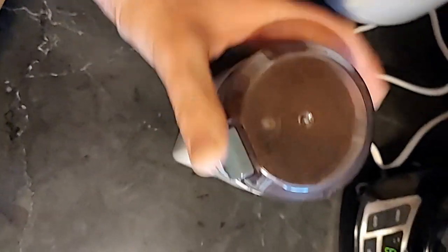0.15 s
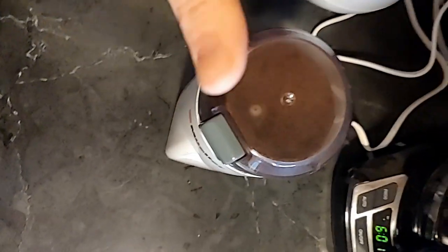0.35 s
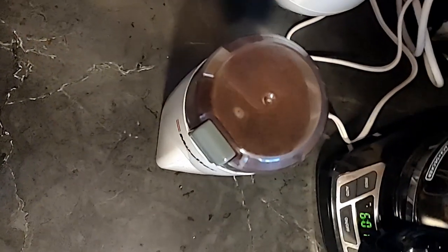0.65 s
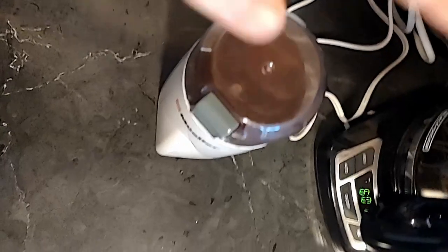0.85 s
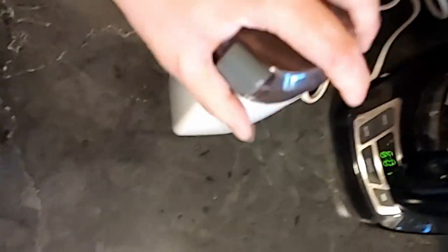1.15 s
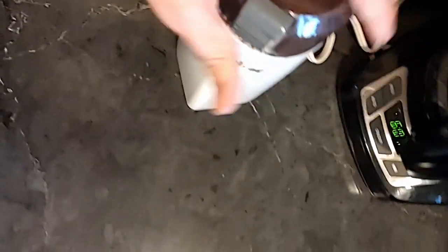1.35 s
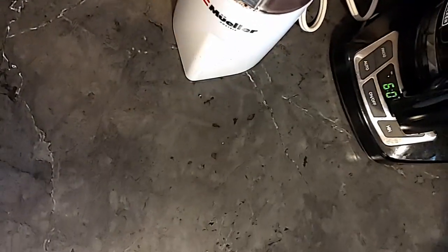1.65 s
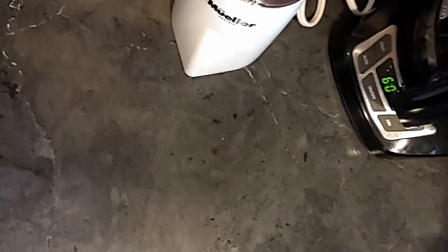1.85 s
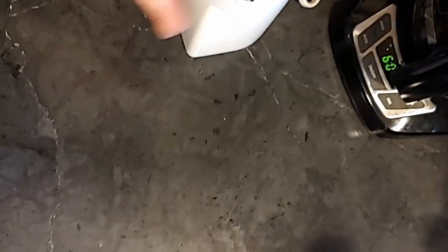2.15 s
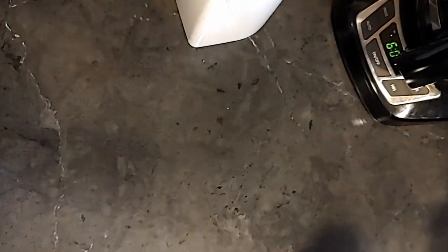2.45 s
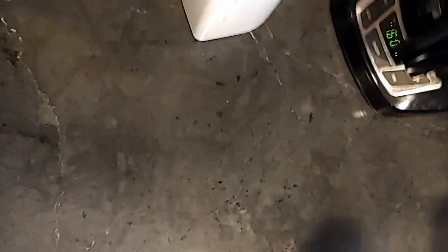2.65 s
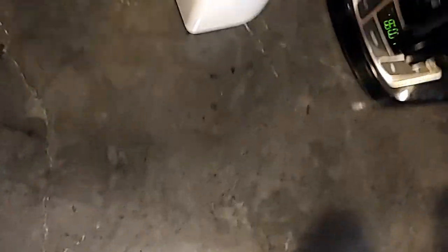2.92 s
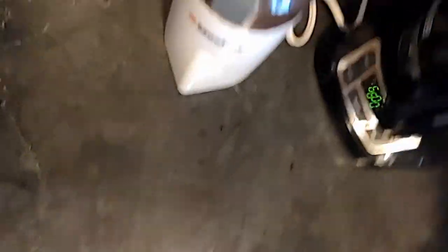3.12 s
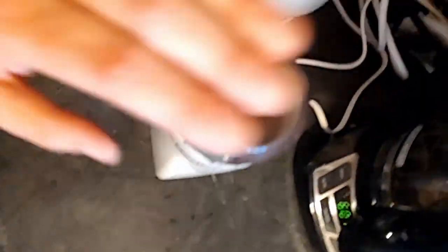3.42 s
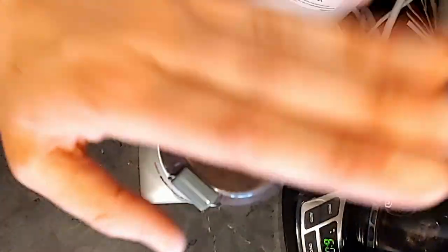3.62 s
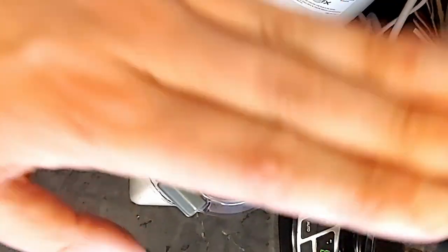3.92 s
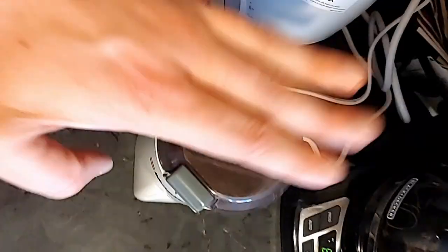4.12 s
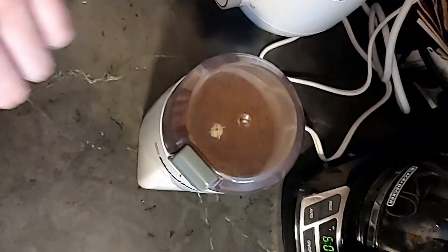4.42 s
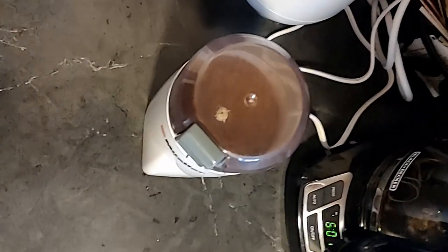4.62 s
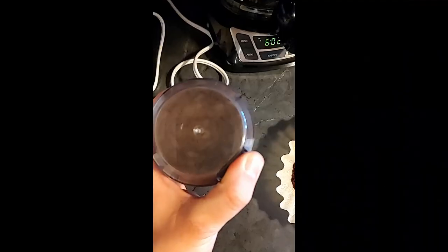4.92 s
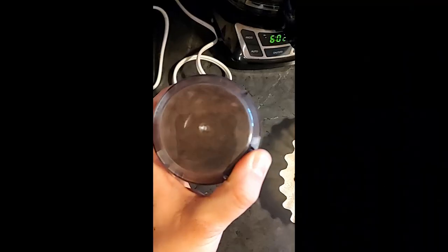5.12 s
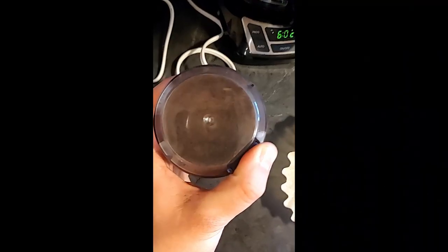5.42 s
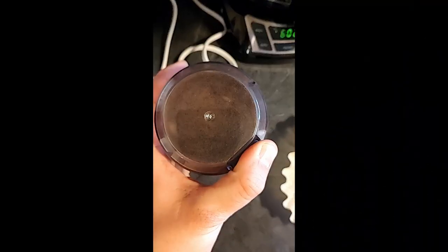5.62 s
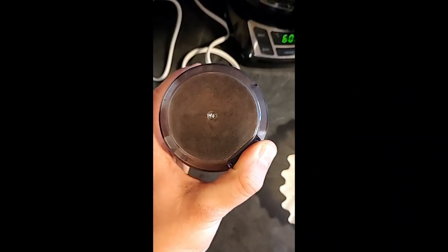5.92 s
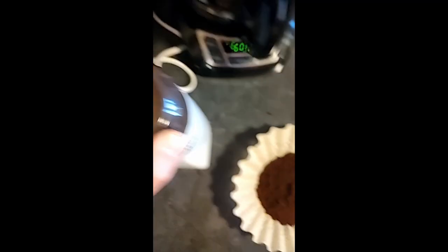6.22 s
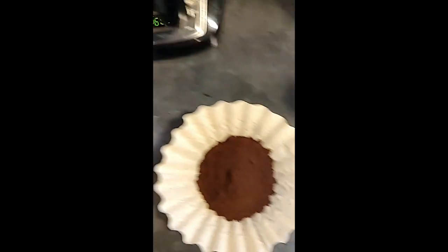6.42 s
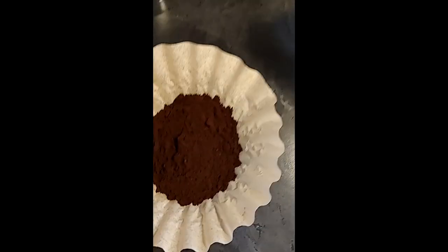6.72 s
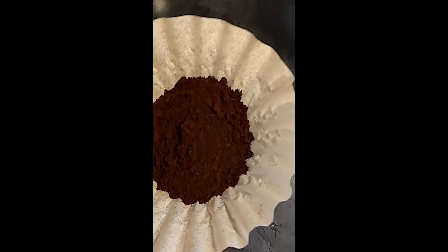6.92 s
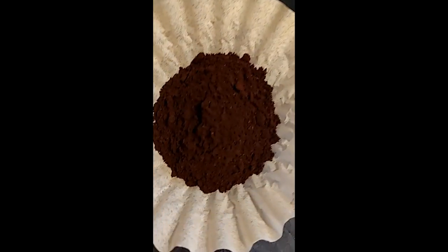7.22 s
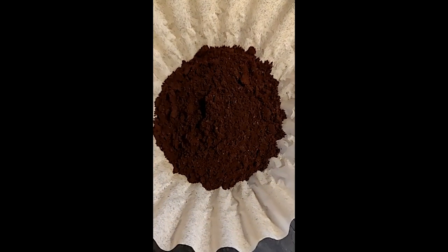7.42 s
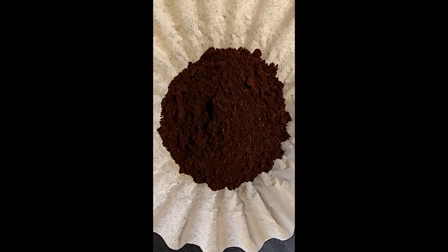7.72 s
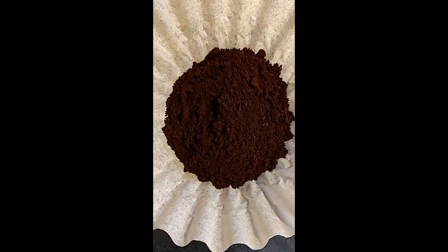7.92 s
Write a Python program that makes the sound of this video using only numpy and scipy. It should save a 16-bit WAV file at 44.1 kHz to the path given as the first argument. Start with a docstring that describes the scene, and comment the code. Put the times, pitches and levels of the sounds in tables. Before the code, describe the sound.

Close stereo on a kitchen counter: a small blade grinder whines loudly with a hissing rattle of nearly finished coffee powder. It switches off with a sharp lid clack and its pitch slides down to a stop. Four hollow plastic knocks, spaced in two pairs, sound over quiet room air. A faint tick and dull pop, a short total silence, then grinding cuts in abruptly with coarse, crackling beans.

```python
"""A kitchen counter, miked in stereo from close by: an electric blade grinder chops coffee beans, then coasts down.
Four knocks clack its lid and thud its housing; faint ticks and a dull pop follow, then the sound drops out.
It starts again on coarser beans, which crack on the blade as the rattle fills in and the churn grows.
The motor is a stack of wavering shaft orders, the coffee is noise shaped by random hits, the knocks are
ringing modes with bursts of noise; surfaces close by return early echoes, over quiet room air."""
import sys
import numpy as np
from scipy import signal
from scipy.fft import rfft, irfft, next_fast_len
from scipy.io import wavfile
from scipy.ndimage import uniform_filter1d, map_coordinates

SR = 44100
rng = np.random.default_rng(int(sys.argv[2]) if len(sys.argv) > 2 else 0)


def persist_wave(psi):
    """Save psi, clipped to +-1, as 16-bit WAV."""
    counts = np.round(np.clip(psi, -1, 1) * 32767).astype(np.int16)
    wavfile.write(sys.argv[1], SR, np.atleast_2d(counts).T)


N = 355446
TIME = np.arange(N) / SR
PULSE_HZ = 120  # torque pulses, two per mains cycle

# where the grinder stands, positive to the left: time_s, left_right_db
STEREO_PLACE = [(0.0, 0.5), (0.2, 1.5), (1.8, 0.5), (5.1, 3), (5.18, 4), (5.9, 7.0), (5.95, 4), (8.05, 0.5)]
# large pieces that crack on the blade, relative levels: start_s, crack_db, splinter_shower_db, shower_length_s
BLADE_CRACKS = [(0.195, -16, -24.5, 0.03), (0.567, -9, -32, 0.005), (0.951, -22, -34.5, 0.1),
                (1.397, -20, -30, 0.13), (1.529, -13.5, -35.5, 0.094), (1.663, -26, -34.5, 0.027),
                (1.686, -24, -39, 0.034), (1.745, -23, -37, 0.015), (5.08, -13, -23.5, 0.054),
                (5.202, -15, -27.5, 0.05), (5.259, -15, -35, 0.099), (5.35, -18, -30.5, 0.15),
                (5.449, -14, -30.5, 0.13), (5.553, -14, -30, 0.092), (5.625, -22, -30.5, 0.03),
                (5.767, -16, -23.5, 0.028), (5.946, -21, -28.0, 0.077), (6.084, -14, -27.5, 0.062),
                (6.219, -17, -26.5, 0.06), (6.289, -13, -28.5, 0.14), (6.369, -16, -29.5, 0.082),
                (6.546, -19, -24, 0.025), (6.605, -18, -28.0, 0.1193), (6.677, -16, -28, 0.21),
                (6.898, -12, -29, 0.11), (7.094, -16.5, -27, 0.0059), (7.19, -15, -30.5, 0.11),
                (7.387, -15, -26, 0.016), (7.443, -17, -29, 0.16), (7.633, -13, -28.5, 0.1064),
                (7.705, -11.5, -30, 0.11), (7.797, -14, -26.5, 0.13), (7.852, -14, -27.5, 0.12),
                (7.958, -18, -28, 0.025), (8.04, -13, -23.0, 0.011), (1.803, -37, -46, 0.0052)]
# spectrum of the rattle of coarse bits, relative: frequency_hz, level_db (per Hz)
COARSE_SPECTRUM = [(500, -39), (1100, -14), (1700, -7.5), (2700, -2), (4200, 0.5), (5200, -7), (7000, -7),
                   (9000, -11), (11000, -16.5), (13500, -11), (15800, -11)]
# spectrum of the churning powder, relative: frequency_hz, level_db (per Hz)
CHURN_SPECTRUM = [(30, -34), (70, -26.5), (110, -15), (190, -16.5), (280, -1.5), (420, -1), (600, 0),
                  (900, 2.5), (1200, 0), (2000, -21), (4000, -46.5)]
# spectrum of the lid's clack, relative: frequency_hz, level_db (per Hz)
CLACK_SPECTRUM = [(900, -24), (1600, -8.5), (2200, 0), (2800, -0.5), (3700, -0.5), (4800, -4), (5600, -15),
                  (7200, -13.5), (9500, -24.5), (13000, -27.5), (15400, -21)]
# resonances of the cup and lid: center_hz, width_hz, boost_db
CUP_RESONANCES = [(1230, 99, 8), (1784, 360, 5), (2450, 130, 1), (3240, 120, 2.5), (3820, 200, 6),
                  (7040, 330, 2.5), (11900, 400, 2), (15100, 210, 10.5)]
# resonances of the clack: center_hz, width_hz, boost_db
LID_RESONANCES = [(2040, 90, 4), (3200, 95, 3.5), (3700, 170, 1.5)]
# resonances of worktop and housing: center_hz, width_hz, boost_db
COUNTER_RESONANCES = [(129.9, 3.5, 10), (281, 20, 6), (384, 13, 4), (500, 28, 6), (586, 31, 4.5),
                      (760, 66, 2.5), (920, 40, 0.5)]


def amp(db):
    """Decibels to gain."""
    return np.exp(np.asarray(db) * np.log(10) / 20)


def unit(x):
    """Scale to rms 1."""
    return x / np.sqrt(np.mean(x ** 2) + 1e-20)


def along(points, hz):
    """Read (Hz, value) points on a log frequency axis."""
    f, v = np.transpose(points)
    return np.interp(np.log(hz + 1), np.log(f + 1), v)


def curves(rows):
    """One value per sample for each column after the time."""
    s, *cols = np.transpose(rows)
    return [np.interp(TIME, s, c) for c in cols]


def wobble(rate):
    """A smooth random curve, rate knots a second."""
    coarse = TIME[::SR // 2000]
    knots = rng.standard_normal(int(N * rate / SR) + 4)
    return np.interp(TIME, coarse, map_coordinates(knots, [coarse * rate]))


def panned(db):
    """Left and right gains for a level difference, positive to the left."""
    return amp(np.array([[.5], [-.5]]) * db)


def filtered(x, response):
    """Shape x by a response of frequency."""
    m = next_fast_len(N + 8192)
    return irfft(rfft(x, m) * response(np.fft.rfftfreq(m, 1 / SR)), m)[..., :N]


def lift(peaks, hz):
    """Decibels that resonances add at a frequency."""
    return sum(db / (1 + ((hz - c) / w) ** 2) for c, w, db in peaks)


def noise(spectrum, peaks=(), lead_s=.00018):
    """Stereo noise of rms 1 with resonances; it reaches the left microphone first."""
    # likeness of the two microphones: frequency_hz, correlation (0 to 1)
    likeness = [(60, .85), (120, 0.91), (380, 0.68), (700, 0.39), (1300, 0.28), (4000, 0.12), (15000, 0.11)]
    colour = lambda hz: amp(along(spectrum, hz) + lift(peaks, hz))
    turn = lambda hz: np.arccos(np.clip(along(likeness, hz), -1, 1)) / 2
    mid, side = filtered(rng.standard_normal((2, N)),
                         lambda hz: colour(hz) * [np.cos(turn(hz)), np.sin(turn(hz))])
    left_right = np.array([mid + side, mid - side])
    return unit(filtered(left_right, lambda hz: np.exp(1j * np.pi * lead_s * np.outer([1, -1], hz))))


def fade(t, t60, rise):
    """Envelope of a blow at t = 0: a smooth onset, then exponential decay."""
    t = np.maximum(t, 0)
    return amp(-60 * t / t60) * (1 - np.exp(-(t / rise) ** 2))


def held(start, end, t60):
    """1 from start to end, then an exponential release."""
    return (TIME >= start) * amp(-60 * np.maximum(TIME - end, 0) / t60)


def ringing(blows, cup_t60, room_db, room_t60):
    """Envelope of many impacts: the energy of each dies fast in the cup and slowly in the kitchen."""
    t = TIME[:SR // 2]
    cup = fade(t, cup_t60, rise=0.00068)
    room = amp(room_db) * fade(t, room_t60, rise=0.0013)
    return np.sqrt(np.abs(signal.fftconvolve(blows ** 2, cup ** 2 + room ** 2)[:N]))


def kitchen():
    """Quiet room air, as shaped noise, with a faint mains hum and a hiss that comes and goes."""
    # spectrum of the room air, relative: frequency_hz, level_db (per Hz)
    air_spectrum = [(30, -31.5), (70, -19), (115, 2.5), (170, -17.5), (260, -3), (600, -3), (850, -4.5),
                    (1300, -16), (2300, -24.5), (3300, -21), (4700, -27), (6000, -31.5), (9500, -39),
                    (15800, -44)]
    # faint hiss: time_s, level_db
    hiss_levels = [(2.55, -105), (2.65, -68), (2.9, -67), (2.98, -96.5), (3.1, -75), (3.55, -73.5),
                   (3.75, -105)]
    air = amp(-65.5 + 0.7 * wobble(5)) * noise(air_spectrum, [(3300, 90, 6)])
    hum = amp(-78) * np.sin(2 * np.pi * PULSE_HZ * TIME)
    hiss_spectrum = [(1000, -14), (3500, 0), (7300, -1), (9800, -10), (12000, 0.5), (15500, 2.0)]
    return air + hum + amp(curves(hiss_levels)[0]) * noise(hiss_spectrum)


def motor(table, orders, whine_db, powered, speed, tone_db, hum_db, throb, jitter, waver_db, pan_db):
    """Shaft orders with torque sidebands; as speed falls from 1 they fade and sweep the housing's resonances."""
    coast_db_per_octave, coast_db_per_order = 12, 2  # fade as the speed halves; each higher order by so much more
    coast_ring = 2.7  # how strongly the gliding orders excite the housing
    coast_quiet = .45  # below this share of the running speed the motor falls silent
    coast_ragged_db = 2.2  # the loose shaft chatters
    unpowered_db = -6  # overtones with the power off
    whine_follows = 0.27  # share of the shaft tone's swells that the high orders take part in
    running_hz, shaft_db, second_db = curves(table)
    hz, octaves = running_hz * speed, np.log2(speed)
    whine_db = whine_db + whine_follows * (shaft_db - np.mean([row[2] for row in table]))

    grid = np.arange(SR // 8)  # Hz
    housing_db = coast_ring * lift(COUNTER_RESONANCES, grid)
    chatter_db = coast_ragged_db * (1 - powered) * wobble(45)
    dying_db = chatter_db - 20 * np.log10(1 + (coast_quiet / speed) ** 20)

    def coasting_db(k):
        """Level change of order k away from full speed."""
        slope = coast_db_per_octave + coast_db_per_order * (k - 1)
        swept_db = np.interp(k * hz, grid, housing_db) - np.interp(k * running_hz, grid, housing_db)
        return dying_db + slope * octaves + swept_db

    turns = 2 * np.pi * np.cumsum(hz * (1 + jitter * wobble(45))) / SR  # beans brake the blade unevenly
    mains = 2 * np.pi * PULSE_HZ * TIME
    spread = np.array([[.5], [-.5]])  # phase between the microphones
    shudder = .04 * wobble(170)  # single impacts jolt the blade and roughen the high orders
    shaft = turns + 0.56 * spread
    sidebands = .55 * np.sin(shaft + mains) + .12 * np.sin(shaft - mains)
    shaft_gain = amp(shaft_db + tone_db + coasting_db(1) + 1.2 * wobble(26))
    out = shaft_gain * (np.sin(shaft) + powered * throb * sidebands)

    overtones = [(2, second_db + tone_db + 0.94)]
    overtones += [(k, whine_db + db + waver_db * wobble(6)) for k, db in orders]
    for k, db in overtones:
        phase = k * turns + rng.uniform(0, 2 * np.pi) + spread * min(k / 2, np.pi / 2)
        torque = 1 + powered * throb * np.cos(mains + rng.uniform(0, 2 * np.pi))
        gain = amp(db + coasting_db(k) + unpowered_db * (1 - powered) + 1.8 * wobble(40))
        out = out + gain * np.sin(phase + k * shudder) * torque
    hum = amp(hum_db + wobble(23)) * powered * np.sin(mains)
    return out * panned(pan_db) + hum


def pelting(hits_per_s, size_db, clump_db, throb):
    """Envelope, rms 1, of bits that hit the cup at random, in clumps, hardest at each torque pulse."""
    struck = rng.random(N) < hits_per_s / SR
    blows = struck * amp(size_db * np.clip(rng.standard_normal(N), -2, 2) + clump_db * wobble(70))
    blows = blows * (1 + throb * np.sin(2 * np.pi * PULSE_HZ * TIME))
    return unit(ringing(blows, cup_t60=.012, room_db=-14.0, room_t60=0.26))


def coffee(spectrum, hits, rattle_db, churn_db, splinter_db, splinter_churn_db):
    """The hits rattle the cup, over the churn of the powder; after every crack the splinters swell both."""
    showers = splinters()
    rattle = np.hypot(amp(rattle_db), amp(splinter_db) * showers) * hits
    bits = rattle * noise(spectrum, CUP_RESONANCES) * panned(curves(STEREO_PLACE)[0])
    powder = np.hypot(amp(churn_db), amp(splinter_churn_db) * showers) * noise(CHURN_SPECTRUM)
    return bits + powder


def reflected(x):
    """Hard surfaces nearby send back early copies, weaker in the bass, that comb the sound."""
    # splashback and appliances: left_delay_s, right_delay_s, level_db (above the bass)
    surfaces = [(.0031, 0.0042, -14), (.0069, 0.0061, -14.5), (0.0105, .0121, -16), (0.017, 0.014, -19)]
    copies = lambda hz: sum(amp(db) * np.exp(-2j * np.pi * np.outer([left, right], hz))
                            for left, right, db in surfaces)
    return filtered(x, lambda hz: 1 + copies(hz) * hz / (hz + 600))


def fine_run():
    """Nearly finished powder at a nearly steady speed; switched off, the blade coasts against drag and friction."""
    # motor under power, relative levels: time_s, shaft_hz, shaft_db, second_order_db
    fine_motor = [(0.0, 362.7, -34, -33.5), (0.14, 359.6, -41.5, -42), (0.37, 362.0, -33.5, -36.5),
                  (0.788, 366, -33.5, -40.5), (0.87, 363.2, -32, -33.5), (1.008, 368.7, -30.5, -47),
                  (1.12, 364.5, -32.5, -33.5), (1.202, 368, -30.5, -48), (1.27, 361, -40, -36.5)]
    # shaft orders, relative levels: multiple, level_db
    fine_orders = [(3, 0.5), (4, -5), (5, 4), (6, -2), (7, 0.8), (8, -16), (9, -6.5), (10, -5.5), (11, 4.5)]
    # spectrum of the rattle of fine bits, relative: frequency_hz, level_db (per Hz)
    fine_spectrum = [(500, -29.5), (1100, -15.5), (1700, -9), (2700, -5), (4200, -3.5), (5200, -11.5),
                     (7000, -13), (9000, -16), (11000, -19.5), (13500, -15), (15800, -12)]
    switch_off_s, run_end_s = 1.288, 1.8
    coast_s, friction = .7, .43  # drag time constant; dry friction as a share of the drag at full speed
    coast_rattle_db = -13  # rattle with the power off

    powered = held(0, switch_off_s, t60=.12)
    slowing = np.exp(-np.maximum(TIME - switch_off_s, 0) / coast_s)
    speed = np.maximum((1 + friction) * slowing - friction, .01)
    hits = pelting(hits_per_s=2300, size_db=6.0, clump_db=2.0, throb=.3)
    grounds = coffee(fine_spectrum, hits,
                     rattle_db=-27.5 + coast_rattle_db * (1 - powered) + .6 * wobble(15),
                     churn_db=-47.5 + 1.5 * wobble(12), splinter_db=-.5, splinter_churn_db=-14)
    whine = motor(fine_motor, fine_orders, -37.3 + 0.64 * wobble(6.7), powered, speed, tone_db=3.5,
                  hum_db=-53.5, throb=0.39, jitter=0.0035, waver_db=1.5, pan_db=-3.5)
    return (whine + reflected(grounds)) * held(0, run_end_s, t60=0.15)


def cracks():
    """Large pieces snap on the blade; a few ring the lid, which also clacks and thumps as it is let go."""
    # bits settle in the resting cup, relative levels: start_s, level_db
    settling_ticks = [(2.843, -45.5), (4.614, -52.5)]
    # the lid is struck, relative levels: start_s, ring_db, clack_db, upper_modes_db
    lid_strikes = [(1.288, -19, -8.5, 4), (1.398, -37, -30, -12), (6.907, -21, -40, -29),
                   (7.096, -24.5, -29, -15)]
    # ringing modes of the lid, relative levels: frequency_hz, level_db, t60_s
    lid_tones = [(1208, 1.5, .07), (3040, -7.5, 0.066), (3510, 1, 0.036)]
    snap, slap, ring = np.zeros((3, N))
    t = TIME[:SR // 4]
    for s, db, *_ in BLADE_CRACKS + settling_ticks:
        snap[round(s * SR)] = amp(db)
    for s, db, clack_db, bright_db in lid_strikes:
        slap[round(s * SR)] = amp(clack_db)
        for k, (hz, level, t60) in enumerate(lid_tones):
            tone = np.sin(2 * np.pi * hz * t + rng.uniform(0, 2 * np.pi))
            gain = amp(db + level + bright_db * (k > 0))
            ring[round(s * SR):][:len(t)] += gain * fade(t, t60, rise=0.002) * tone
    sharp = amp(-7) * ringing(snap, cup_t60=0.046, room_db=-23, room_t60=0.25)
    sharp = sharp * noise(COARSE_SPECTRUM, CUP_RESONANCES)
    clack_and_thump = amp(3) * noise(CLACK_SPECTRUM, LID_RESONANCES) + amp(-3.5) * noise(CHURN_SPECTRUM)
    clack = ringing(slap, cup_t60=0.019, room_db=-23.5, room_t60=0.22) * clack_and_thump
    return (sharp + clack + ring) * panned(curves(STEREO_PLACE)[0])


def splinters():
    """Level of the showers: each starts with its crack, sags while it lasts and dies away."""
    shower_sag_db, shower_t60 = 2.5, 0.13  # weakening over its length; decay afterwards in s
    energy, t = np.zeros(N + SR), TIME[:SR // 2]
    for s, _, db, length in BLADE_CRACKS:
        sag_db = shower_sag_db * (.5 - np.minimum(t / length, 1))
        dying_db = -60 * np.maximum(t - length, 0) / shower_t60
        energy[round(s * SR):][:len(t)] += amp(db + sag_db + dying_db) ** 2
    return np.sqrt(energy[:N])


def knocks():
    """Each blow clacks the lid and thuds the hollow housing on the counter; the ring swells again a moment later."""
    # knocks on the grinder, relative levels: start_s, level_db, clack_db, left_right_db, hollow_hz,
    # tail_t60_s, late_swell_db, swell_delay_s, worktop_boom_db
    blows = [(2.262, -4, -7.5, -0.5, 617, 0.26, -22, 0.1, -26.5),
             (2.604, -5, -7.5, -2, 643, 0.35, -20.5, 0.11, -27),
             (3.801, -0.5, -15.5, 2.5, 794, 0.2, -32.5, .105, -31.5),
             (4.182, -3, -11, 2, 618, 0.28, -22.5, 0.1, -34)]
    # modes of the housing on the counter, relative levels: frequency_hz, level_db, t60_s
    housing_modes = [(140, -27, 0.13), (428, -17.5, 0.159), (586, -5, 0.11), (737, 4, 0.048),
                     (867, -22, 0.27), (1012, -27, 0.26), (1102, -27.5, 0.13), (1180, -11, 0.11),
                     (1394, -20, 0.087)]
    # spectrum of the thud, relative: frequency_hz, level_db (per Hz)
    thud_spectrum = [(41, -63), (70, -37), (119, -7.5), (209, -19.5), (269, -8), (321, -13.5), (392, -3.5),
                     (491, -2.5), (539, -5), (650, -1.5), (1070, -2.5), (1410, -11), (1700, -9.5),
                     (2210, -40.5), (3740, -120)]
    out = np.zeros((2, N))
    thud = noise(thud_spectrum, COUNTER_RESONANCES)
    clack = noise(CLACK_SPECTRUM, LID_RESONANCES)
    dull = filtered(clack, lambda hz: 1 / (1 + (hz / 6500) ** 2))  # the kitchen soaks up the treble
    t = TIME[:SR // 2]
    spread = np.array([[.4], [-.4]])  # phase between the microphones

    def mode(hz, t60):
        """One decaying sine, at a random phase."""
        return fade(t, t60, rise=.002) * np.sin(2 * np.pi * hz * t + rng.uniform(0, 2 * np.pi) + spread)

    def struck(envelope, x):
        """Noise under an envelope; the blow sets the energy."""
        return unit(envelope * x) * np.sqrt(np.mean(envelope ** 2))

    for s, db, clack_db, pan_db, hollow_hz, t60, swell_db, delay, boom_db in blows:
        part = slice(round(s * SR), round(s * SR) + len(t))
        housing = sum(amp(level + rng.normal(0, 1.7)) * mode(hz, life) for hz, level, life in housing_modes)
        swell = amp(swell_db) * fade(t - delay, t60, rise=.002)
        tones = amp(-12) * housing / np.abs(housing).max() + amp(-4) * mode(hollow_hz, .045)
        tones = tones + amp(boom_db) * mode(128, 0.17)  # the worktop booms
        low = amp(-10.0) * struck(fade(t, .04, rise=0.0019), thud[:, part])
        low = low + amp(-10.5) * struck(amp(-6.5) * fade(t, t60, rise=.011) + swell, thud[:, part])
        high = amp(5) * fade(t - .001, 0.019, rise=.0015) * clack[:, part]
        high = high + amp(-19) * fade(t, 0.18, rise=0.0024) * clack[:, part]
        high = high + (amp(-24) * fade(t, t60, rise=0.0071) + amp(-12) * swell) * dull[:, part]
        out[:, part] += amp(db) * (tones + low + amp(clack_db + 3.5) * high) * panned(pan_db)
    # a high-pass at 85 Hz keeps deep rumble out of the knocks
    return signal.sosfilt(signal.butter(2, 85, "highpass", fs=SR, output="sos"), out)


def pops():
    """Short dull pops of little more than one cycle, each a cosine under a bell-shaped envelope."""
    # dull pops: center_s, envelope_peak_db, pitch_hz
    pop_rows = [(4.617, -41.5, 277.5), (5.294, -16, 420)]
    out = 0
    for s, db, hz in pop_rows:
        bell = np.exp(-((TIME - s) * hz * 3.3) ** 2)
        out = out + amp(db) * bell * np.cos(2 * np.pi * hz * (TIME - s) + 0.93)
    return out


def cavity(hits, width_hz):
    """The hits also ring the air in the cup: a noise band whose center glides."""
    # the air above the beans rings lower as they turn to powder: time_s, center_hz, level_db
    air_glide = [(5.1, 1328, -49), (5.6, 1320, -44.5), (6.1, 1320, -38.5), (6.4, 1302, -37),
                 (6.8, 1185, -43), (7.4, 1140, -49.5), (8.06, 1137, -43.5)]
    hz, db = curves(air_glide)
    band = unit(filtered(rng.standard_normal((2, N)), lambda f: 1 / (1 + (f / width_hz) ** 2)))
    return amp(db) * hits * unit(band * np.sin(2 * np.pi * np.cumsum(hz) / SR))


def coarse_run():
    """Whole beans wear down: the rattle fills in, the powder churns more and the whine comes through."""
    # motor under power, relative levels: time_s, shaft_hz, shaft_db, second_order_db
    coarse_motor = [(5.1, 340.7, -46, -62), (5.18, 339, -58.5, -67), (5.29, 348.3, -53, -50.5),
                    (5.33, 350.0, -54, -58), (5.81, 352.9, -46.5, -63.5), (6.07, 362.2, -41, -58),
                    (6.36, 363.2, -39, -42.5), (6.48, 361.1, -48.5, -50), (6.66, 363.5, -44.5, -38),
                    (6.73, 363.8, -43.5, -51), (7.1, 361.6, -39.5, -47.5), (8.05, 367.3, -42, -42)]
    # shaft orders, relative levels: multiple, level_db
    coarse_orders = [(3, 1.5), (4, -14.5), (5, -3.5), (6, -8.5), (7, -3), (8, -6.5), (10, -18.5)]
    restart_s, wear_s = 5.079, 1.64  # start; time constant in which whole beans wear down
    coarseness = np.exp(-np.maximum(TIME - restart_s, 0) / wear_s)
    hits = pelting(hits_per_s=600, size_db=5.0, clump_db=2.5, throb=0.059)
    grounds = coffee(COARSE_SPECTRUM, hits, rattle_db=-28.0 - 4 * coarseness + 0.45 * wobble(19),
                     churn_db=-46 - 14 * coarseness + 1.9 * wobble(12), splinter_db=-1, splinter_churn_db=-19.5)
    whine = motor(coarse_motor, coarse_orders, -35 - 14 * coarseness, powered=0.98, speed=1, tone_db=3.5,
                  hum_db=-70.5, throb=0.22, jitter=0.0069, waver_db=1.7, pan_db=5.0)
    return (whine + reflected(grounds + cavity(hits, width_hz=163))) * (TIME >= restart_s)


def scene():
    """Both runs, the cracks, knocks and pops, and the room."""
    return fine_run() + coarse_run() + reflected(cracks() + knocks()) + pops() + kitchen()


def record(dry):
    """The microphone thins the bass and rounds loud peaks; the sound drops out briefly and is band-limited."""
    # silence before the second run: start_s, end_s
    dropout = (4.803, 5.079)
    top_hz = 15850
    live = (TIME < dropout[0]) | (TIME > dropout[1])
    thin = signal.sosfilt(signal.butter(2, 65, "highpass", fs=SR, output="sos"), dry)
    rounded = thin / (1 + (thin / .88) ** 6) ** (1 / 6)
    gated = rounded * uniform_filter1d(live * 1., size=64)  # soft edges
    return filtered(gated, lambda hz: 1 / (1 + (hz / top_hz) ** 200))


dry = scene()
out = record(dry)
persist_wave(out)
```